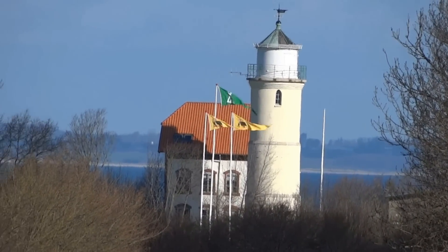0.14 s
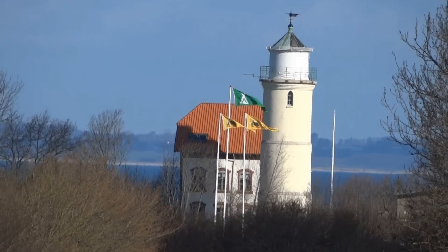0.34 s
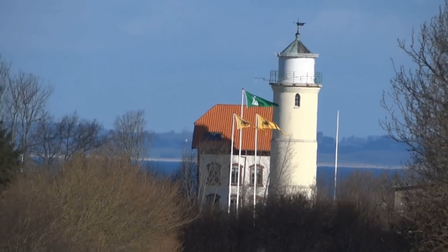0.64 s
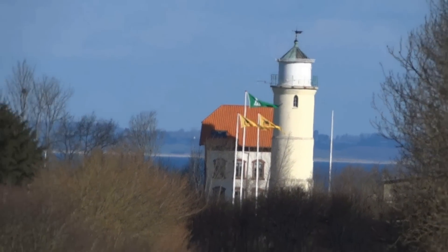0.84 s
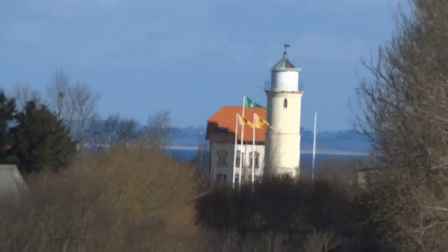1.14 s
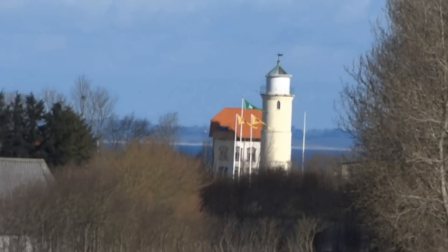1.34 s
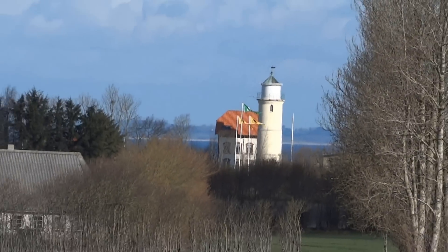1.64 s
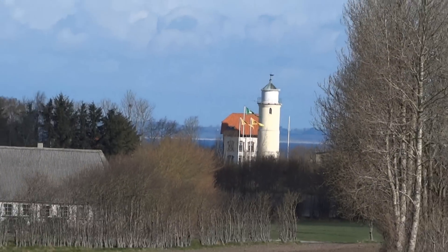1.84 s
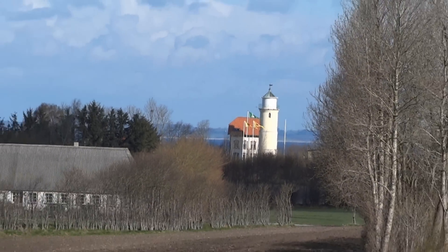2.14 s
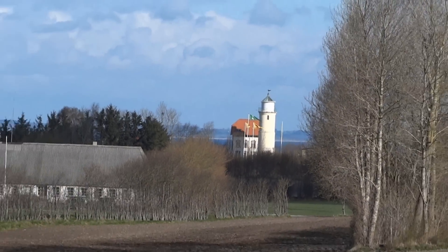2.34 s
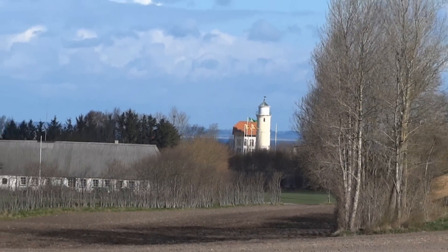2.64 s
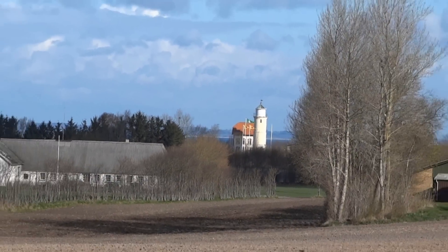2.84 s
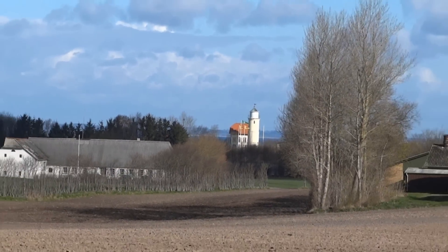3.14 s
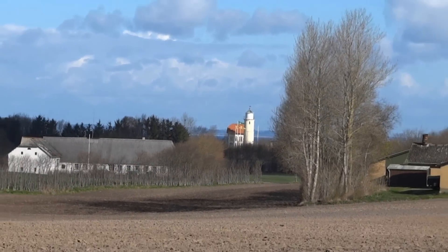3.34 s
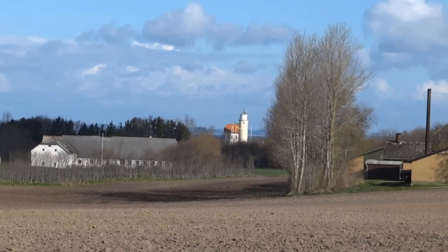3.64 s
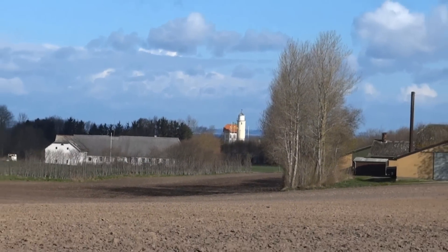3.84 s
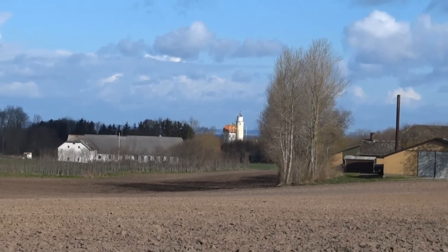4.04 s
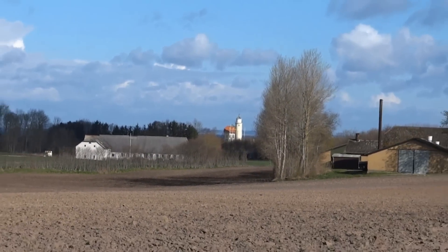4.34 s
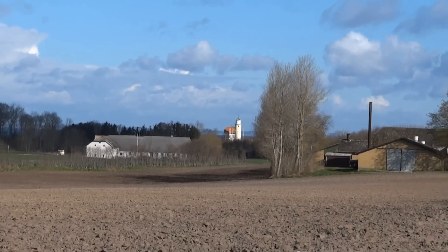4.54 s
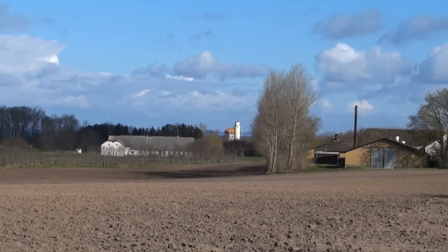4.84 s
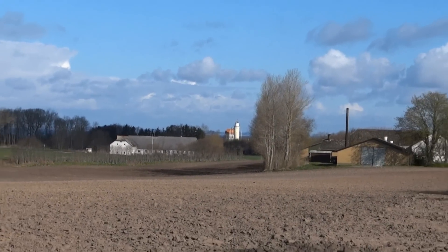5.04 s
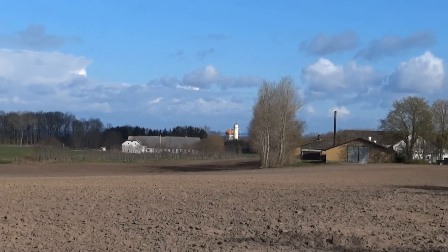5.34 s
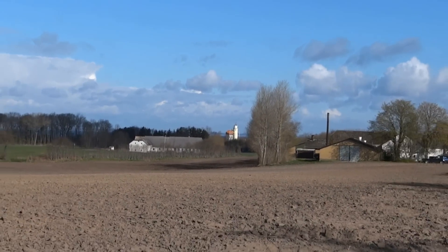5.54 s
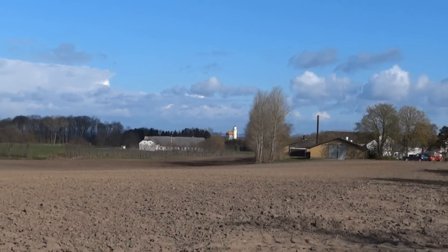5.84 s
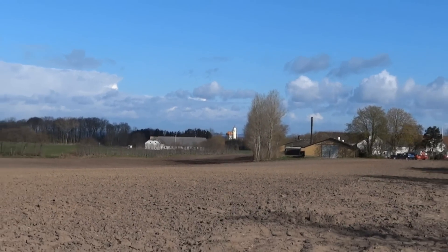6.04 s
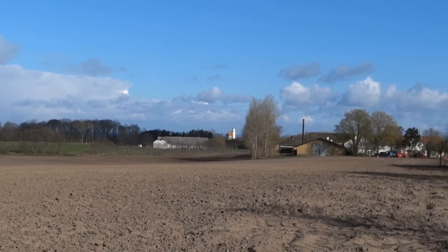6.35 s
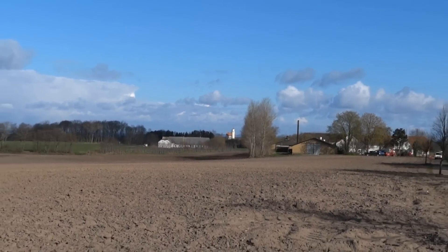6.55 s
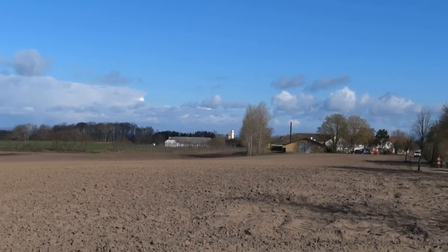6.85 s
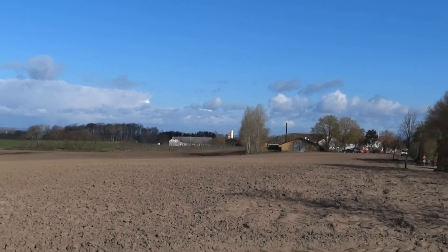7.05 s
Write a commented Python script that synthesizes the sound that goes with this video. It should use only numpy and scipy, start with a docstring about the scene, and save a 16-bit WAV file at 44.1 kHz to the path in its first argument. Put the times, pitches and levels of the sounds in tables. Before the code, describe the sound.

Outdoors by an open field, a short bright plastic click starts a small zoom motor inside the camera. It whirs continuously with a nasal, fluttering whine, rough growl and fine gear ticking, loudest near the middle and buzzier later. Low wind rumbles and buffets the built-in microphones, with the strongest gust late on, over faint hiss.

```python
"""A camcorder zooms out outdoors; its zoom motor reaches the two microphones through the body.
A short click opens the scene, and the rubbing of the shaft fades in. The rotor turns about 30 times a second
in six steps: they make the housing whine and growl, the gears tick, and the shaft rubs twice a turn.
The motor is strongest near 3 s; from about 5 s its steps buzz harder. Throughout, random noise makes a hiss
and a light wind that rumbles and buffets, with short falling tones as thumps and strong gusts near 5.4 s."""
import sys
import numpy as np
from scipy import signal
from scipy.fft import rfft, irfft, next_fast_len
from scipy.io import wavfile
from scipy.ndimage import uniform_filter1d, map_coordinates

SR = 44100
rng = np.random.default_rng(int(sys.argv[2]) if len(sys.argv) > 2 else 0)


def store_pcm(level_fs):
    """Save levels as 16-bit WAV."""
    pcm = np.round(np.clip(level_fs, -1, 1) * 32767).astype(np.int16)
    wavfile.write(sys.argv[1], SR, np.atleast_2d(pcm).T)


N = 317520  # length in samples
STEPS = 6  # magnetic steps in one turn of the rotor

# how fast the rotor spins: (time_s, turns_per_s)
SPIN = [(0.0, 30.97), (0.161, 28.42), (0.33, 29.76), (0.939, 29.84), (1.199, 28.48), (1.641, 30.34),
        (2.41, 29.58), (2.649, 30.14), (2.901, 28.67), (3.21, 30.17), (4.21, 30.63), (4.519, 29.75),
        (4.749, 30.5), (5.33, 30.33), (5.55, 29.51), (5.821, 30.6), (6.602, 29.58), (7.2, 30.47)]
# how hard the drive shakes the body; only rises and falls count: (time_s, level_db)
DRIVE_LOAD = [(0.08, -40), (0.89, -36), (0.99, -36.5), (1.16, -33.5), (1.93, -32.5), (2.78, -31),
              (2.85, -28.5), (3.57, -29.5), (4.24, -32), (6.0, -34.5), (6.9, -34), (7.0, -34)]


def amp(db):
    """Turn decibels into a gain."""
    return 10 ** (np.asarray(db) / 20)


def unit(x):
    """Scale a sound to an rms (average strength) of 1."""
    return x / np.sqrt(np.mean(x ** 2) + 1e-20)


def along(points, hz):
    """Read (pitch_hz, value) points on a logarithmic pitch axis."""
    f, values = np.transpose(points)
    return np.interp(np.log(hz + 1), np.log(f), values)


def curves(rows):
    """Draw straight lines between timed rows: one curve for each column after the time."""
    time_s, *columns = np.transpose(rows)
    return [np.interp(np.arange(N) / SR, time_s, column) for column in columns]


def swing(rows):
    """A level curve in dB about its own average."""
    db, = curves(rows)
    return db - db.mean()


def swell(time_s, spread_s, db):
    """A bell-shaped rise in dB around one moment."""
    return db * np.exp(-.5 * ((np.arange(N) / SR - time_s) / spread_s) ** 2)


def wobble(rate):
    """A smooth random curve with rate random points a second."""
    points = rng.standard_normal(int(N * rate / SR) + 4)
    return map_coordinates(points, [np.arange(N) * rate / SR])


def filtered(x, response):
    """Multiply the spectrum of x by a response that depends on pitch."""
    m = 2 * next_fast_len((N + SR // 4) // 2)  # room for the sound to ring on
    return irfft(rfft(x, m) * response(np.fft.rfftfreq(m, 1 / SR)), m)[..., :N]


def ring(x, modes):
    """Let x ring in resonances (pitch_hz, width_hz, level_db), never before it strikes; rms 1."""
    def response(hz):
        power = sum(amp(db) ** 2 / (1 + (2 * (hz - centre) / width) ** 2) ** 2 for centre, width, db in modes)
        # folding the cepstrum forward in time makes the ringing follow its cause
        cepstrum = irfft(np.log(power + 1e-12) / 2)
        half = len(cepstrum) // 2
        return np.exp(rfft(np.r_[cepstrum[0], 2 * cepstrum[1:half]], 2 * half))
    return unit(filtered(x, response))


def sliding(x, parts):
    """The parts ring differently as the lens slides along its rails: blend from station to station."""
    # times at which the lens reaches its stations: (time_s)
    station_times = [1.15, 1.4, 3.1, 4.6, 6.4]
    parts, t = np.array(parts), np.arange(N) / SR
    shares = [np.interp(t, station_times, one) for one in np.eye(len(station_times))]
    pitches, widths, *levels = parts.T
    return sum(share * ring(x, zip(pitches, widths, db)) for share, db in zip(shares, levels))


def steadied(x, hold, span_s):
    """The drive feeds in energy at an even rate, so the vibration swells and sags less than free noise."""
    power = np.abs(uniform_filter1d(np.mean(np.atleast_2d(x) ** 2, axis=0), int(span_s * SR)))
    return unit(x / (power + 0.018) ** (hold / 2))


def wandering(x, depth_db):
    """The tone colour wanders as the moving parts meet at ever new spots."""
    z = signal.stft(x, nperseg=512)[2]
    field = rng.standard_normal(z.shape[-2:])
    field = uniform_filter1d(field, size=4, axis=0)  # smooth across pitch
    field = uniform_filter1d(field, size=16, axis=1)  # smooth in time
    return unit(signal.istft(z * amp(depth_db * unit(field)), nperseg=512)[1][..., :N])


def spread(apart):
    """Stereo white noise; apart is how strong the left-right difference is beside the common part."""
    mid, side = rng.standard_normal((2, N))
    return unit(np.array([mid + apart * side, mid - apart * side]))


def ports(x, left_db, lead):
    """Body-borne sound is left_db stronger at the left microphone and lead samples sooner there."""
    pair = filtered(x, lambda hz: np.exp(np.outer([1, -1], 1j * np.pi * hz * lead / SR)))
    return pair * amp([[left_db / 2], [-left_db / 2]])


def hiss():
    """Fine noise of air, microphones and drive; it grows a little with the load."""
    # colour of the hiss: (pitch_hz, level_db)
    hiss_colour = [(100, 34), (600, 9), (2000, 9), (3000, 21.5), (5000, 8), (7000, 9), (10000, 4.5),
                   (14000, 5), (15200, -5)]
    noise = unit(filtered(spread(apart=0.029), lambda hz: amp(along(hiss_colour, hz))))
    level_db = -44 + 0.3 * swing(DRIVE_LOAD)  # -44 dB at average load
    return amp(level_db) * noise


def rush(spectrum):
    """Turbulence of rms 1: how alike the two microphones hear it depends on pitch, most at the lowest."""
    # how alike left and right are in the wind: (pitch_hz, likeness from 0 to 1)
    likeness = [(25, 1), (80, 0.96), (170, 0.82), (330, 0.31), (700, 0.42)]

    def response(hz):
        turn = np.arccos(np.clip(along(likeness, hz), -1, 1)) / 2
        return amp(along(spectrum, hz)) * [np.cos(turn), np.sin(turn)]
    mid, side = filtered(rng.standard_normal((2, N)), response)
    return unit(np.array([mid + side, mid - side]))


def thump(u, hz, length, fall, apart):
    """An eddy passes both ports slightly out of step: a few cycles that fall in pitch."""
    cycles = hz * length / fall * (1 - np.exp(-fall * u / length))
    start = rng.random() + apart * rng.standard_normal((2, 1))
    return np.exp(-(u / length) ** 2) * np.cos(2 * np.pi * (cycles + start))


def wind():
    """Breeze and gusts drive a low rumble and lumpy buffeting above it; single eddies thump."""
    # slow strength of the wind; only rises and falls count: (time_s, level_db)
    breeze = [(0.1, -18.5), (0.67, -27.5), (2.47, -27), (3.0, -33), (3.52, -29), (4.38, -36), (6.42, -32),
              (6.66, -27), (7.15, -35)]
    # short gusts: (time_s, spread_s, rise_db)
    gusts = [(.5, .06, 4.5), (1.067, .03, 4.5), (1.966, 0.027, 6), (2.14, .035, 3.5), (2.66, 0.042, 2),
             (3.355, 0.061, 2.5), (3.62, .06, 1), (4.002, .1, 2.5), (5.066, 0.028, 5.5), (5.375, 0.049, 13),
             (5.62, 0.052, 7.5), (6.033, .06, 2), (6.334, 0.035, 4), (6.56, 0.044, 5.5),
             (6.922, 0.027, 7.5)]
    # colours of the two kinds of wind noise: (pitch_hz, level_db)
    rumble_colour = [(12, -30), (25, -16), (40, -7.5), (70, -2), (95, -2.5), (130, -10.5), (220, -32),
                     (500, -90)]
    buffet_colour = [(50, -48), (90, -8.5), (125, -0.5), (170, -1.5), (240, -8), (330, -11.5), (480, -21),
                     (800, -31.5), (2500, -101)]
    # eddies that hit the microphones: (time_s, pitch_hz, level_db, length_s)
    eddies = [(.028, 192, -14.5, 0.015), (0.109, 180, -13, 0.0064), (1.059, 165, -11, 0.0064),
              (1.404, 179, -14, 0.0093), (1.784, 116, -10, 0.0052), (1.97, 137, -10.5, 0.0057),
              (3.311, 112, -10.5, 0.007), (5.353, 168, -9, .0057), (5.407, 165, -8, 0.0055),
              (6.732, 105, -3.5, .0048), (6.791, 135, -10.5, 0.0055)]

    breeze_db = swing(breeze)
    gust_db = sum(swell(*gust) for gust in gusts)
    gust_db = gust_db + 1.37 * wobble(12)  # small random swells
    # in dB; the rumble follows the breeze less than the buffeting does, but gusts more
    rumble_db = -30 + 0.32 * breeze_db + gust_db
    buffet_db = -30.5 + breeze_db + 0.78 * gust_db
    rumble = amp(rumble_db) * rush(rumble_colour)
    buffeting = amp(buffet_db) * unit(amp(1.5 * wobble(25)) * rush(buffet_colour))
    air = rumble + buffeting
    t = np.arange(N) / SR
    for time_s, hz, db, length in eddies:
        near = np.abs(t - time_s) < 4 * length
        air[:, near] += amp(db) * thump(t[near] - time_s, hz, length, fall=0.33, apart=0.075)
    return air * amp([[.25], [-.25]])  # dB: a touch stronger on the left


def click():
    """The lens drive takes up its slack: one short, bright scrape of plastic."""
    # when and how strongly it scrapes: (start_s, level_db)
    slack = (0.0074, -31.5)
    # resonances of the plastic: (pitch_hz, width_hz, level_db)
    plastic_modes = [(4300, 770, 4), (5250, 650, -4)]
    start_s, db = slack
    u = np.maximum(np.arange(N) / SR - start_s, 0) / 0.0035  # time in units of 3.5 ms
    envelope = u * np.exp(-u) * 2
    return amp(db) * envelope * ring(rng.standard_normal(N), plastic_modes)


def cogging(turns, offset, sharp, repeat, apart):
    """A rough push at every step; part of its grain comes back each half turn, slowly slipping."""
    mean_speed = np.mean(np.transpose(SPIN)[1])
    grain = rng.standard_normal(round(SR / mean_speed / 2))
    angle = 2 * turns + .014 * wobble(5)
    surface = unit(np.interp(angle % 1, np.linspace(0, 1, len(grain)), grain))
    gate = np.exp(sharp * np.cos(2 * np.pi * STEPS * (turns - offset)))
    return gate * (repeat * surface + spread(apart))


def step_pulses(turns, offset, jitter_s, sizes_db, scatter_db):
    """One impulse at every step, slightly uneven in time and size."""
    step = np.arange(1, int(turns[-1] * STEPS))
    chance = rng.standard_normal((len(step), 2))
    at = np.interp(step / STEPS + offset, turns, np.arange(N)) + jitter_s * SR * chance[:, 0]
    size = amp(np.take(sizes_db, step, mode="wrap") + scatter_db * chance[:, 1])
    return np.bincount(np.clip(at, 0, N - 1).astype(int), size, N)


def shaft_rub(turns):
    """The shaft is slightly out of true and rubs at two angles, scraping harder for moments."""
    # where it rubs: (part_of_a_turn, width_turns, level_db)
    rub_spots = [(.26, 0.029, -6), (.7, 0.046, -5.5)]
    # moments of harder scraping: (time_s, rise_db)
    scrapes = [(1.95, 2), (4.15, 2.5), (4.78, 2), (5.12, 3), (5.82, 2)]
    # shaft resonances: (pitch_hz, width_hz, then level_db at each of five lens stations)
    shaft_modes = [(6480, 440, -18, -12, -2, -11.5, 1.5), (7230, 420, 3, 6, 5, -7, 0.5),
                   (8010, 340, 7, 3, 5.5, 1.5, 4.5), (8560, 310, -17, 2, 2, -4, 4.5),
                   (9210, 430, -3.5, -2, 7, -3, -5.5), (9700, 4200, -13, -11, -9.5, -22.5, -11.5),
                   (13800, 1200, -30, -26, -15, -28, -22)]
    contact = 0.18  # a faint rub all the way round
    for at, width, db in rub_spots:
        distance = (turns - at + .5) % 1 - .5
        contact = contact + amp(db) * np.exp(-.5 * (distance / width) ** 2)
    rub = sliding(contact * amp(1.44 * wobble(45)) * spread(apart=0.33), shaft_modes)
    # the rubbing starts as the drive takes up the lens
    attack = 1 - np.exp(-np.arange(N) / SR / 0.079)
    rub_db = -52 + sum(swell(time_s, .08, db) for time_s, db in scrapes)
    return attack * amp(rub_db) * wandering(rub, depth_db=2.0)


def gear_ticks(turns):
    """Gear play: a tick at every step over the fine grinding of the teeth."""
    # tick strength at each of the six steps of a turn: (level_db)
    teeth_db = [-3.5, -8, -2, -8, 0, -7]
    # what one tooth contact excites: (pitch_hz, width_hz, level_db)
    tooth_modes = [(3610, 3850, 0)]
    # stiff spots of the lens travel, where the gears sound harder: (time_s, rise_db)
    stiff_spots = [(.9, 1.5), (2.44, 1.5), (4.54, 2), (5.02, 3.5), (5.48, 3.5), (6.55, 4), (7.1, 3.5)]
    # gear resonances: (pitch_hz, width_hz, then level_db at each of five lens stations)
    gear_modes = [(2424, 420, -8, -10, -14.5, -12.5, -6), (2800, 164, -6, -6, -9.5, -0.5, 2.5),
                  (3336, 373, -1.5, -3, 6, 2.5, 6.5), (3777, 346, 4, 4.5, 3, 4, 7),
                  (4440, 490, -7.5, -1.5, -5.5, -5.5, -2.5), (5420, 910, -12.5, -10.5, -14.5, -12.5, -11)]
    contacts = step_pulses(turns, offset=-.02, jitter_s=.0003, sizes_db=teeth_db, scatter_db=1.6)
    ticks = amp(-6.8) * ring(contacts, tooth_modes)
    grinding = spread(apart=0.12)
    stiff_db = sum(swell(time_s, 0.12, db) for time_s, db in stiff_spots)
    gear_db = -39 + 0.93 * swing(DRIVE_LOAD) + stiff_db
    return amp(gear_db) * wandering(sliding(ticks + grinding, gear_modes), depth_db=1.87)


def step_buzz(turns):
    """The steps turn into a harder buzz toward the wide end of the zoom."""
    # strength of the buzz: (time_s, level_db)
    buzz_level = [(0, -48), (2, -44), (4, -52), (5, -37), (6, -35), (7.2, -32)]
    # resonances the buzz excites: (pitch_hz, width_hz, level_db)
    buzz_modes = [(1350, 360, -0.91), (1407, 430, 0.46), (1625, 250, -0.97)]
    # the steps run a little early or late as the load shifts
    uneven_turns = turns + .011 * wobble(9)
    pulses = step_pulses(uneven_turns, offset=-0.0286, jitter_s=.0001, sizes_db=[0], scatter_db=1.0)
    return amp(curves(buzz_level)[0]) * ring(pulses, buzz_modes)


def barrel_growl(turns):
    """The rotor's steps shake the lens barrel, whose lower resonances growl."""
    # barrel resonances: (pitch_hz, width_hz, then level_db at each of five lens stations)
    barrel_modes = [(432, 190, -11.5, -7.5, -11.5, -3, -6.5), (649.4, 95, -1, -3, -3, 5, 4),
                    (773, 110, -7.5, -5.5, -9.5, -4, 1), (952, 184, 1.5, 1.5, 0.5, 5.5, 5),
                    (1100, 170, -10, -4, -12.5, 4, -44)]
    push = cogging(turns, offset=0.04, sharp=0.77, repeat=0.27, apart=0.087)
    growl_db = -36.5 + 1.04 * swing(DRIVE_LOAD)
    return amp(growl_db) * steadied(sliding(push, barrel_modes), hold=0.45, span_s=0.0055)


def housing_whine(turns):
    """The rotor's steps shake the housing, whose narrow resonances whine."""
    # housing resonances: (pitch_hz, width_hz, then level_db at each of five lens stations)
    housing_modes = [(1233, 213, -10.5, -11, -13, -14, -12), (1406, 92, -1.5, -1.5, -6, -4.5, -0.5),
                     (1467, 112, 0, -3, -1.5, -2, -2), (1650, 160, -11.5, -18, -19, -16.5, -14),
                     (1800, 397, -16, -18, -22, -22.5, -29.5)]
    push = cogging(turns, offset=-0.037, sharp=1.0, repeat=0.54, apart=0.22)
    whine_db = -31.5 + swing(DRIVE_LOAD)
    return amp(whine_db) * steadied(sliding(push, housing_modes), hold=0.41, span_s=0.0054)


def motor():
    """The rotor's angle times every layer, so they all pulse together."""
    turns = np.cumsum(curves(SPIN)[0]) / SR
    whine = housing_whine(turns)
    growl = barrel_growl(turns)
    buzz = step_buzz(turns)
    gears = gear_ticks(turns)
    rub = shaft_rub(turns)
    return (ports(whine + buzz, left_db=0.2, lead=4.0) + ports(growl, left_db=1.5, lead=7.5)
            + ports(gears, left_db=2.5, lead=1.93) + ports(rub, left_db=-1.0, lead=0.03))


def scene():
    """Hiss, wind, click and motor add up at the two microphones."""
    return hiss() + wind() + click() + motor()


def record(dry):
    """The camera keeps nothing from its band limit of 15150 Hz upward."""
    return filtered(dry, lambda hz: hz < 15150)


dry = scene()
out = record(dry)
store_pcm(out)
```